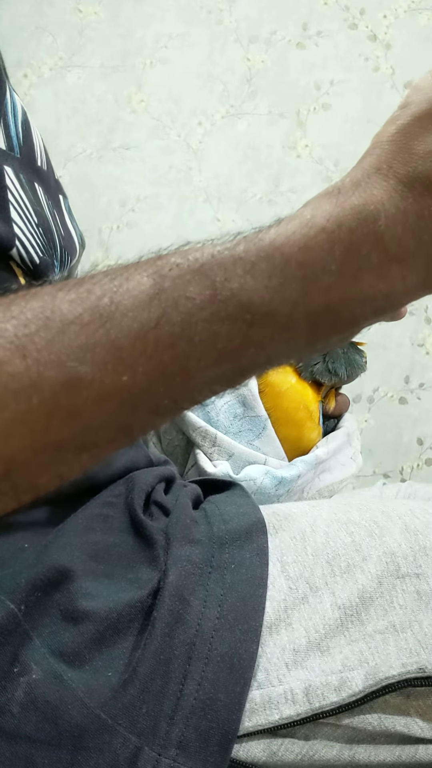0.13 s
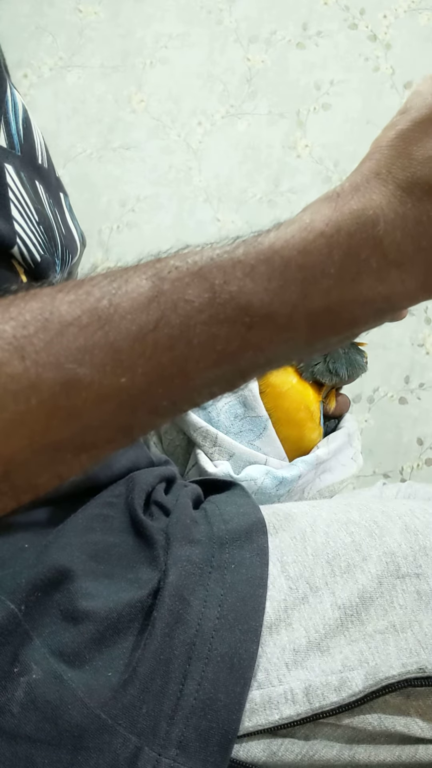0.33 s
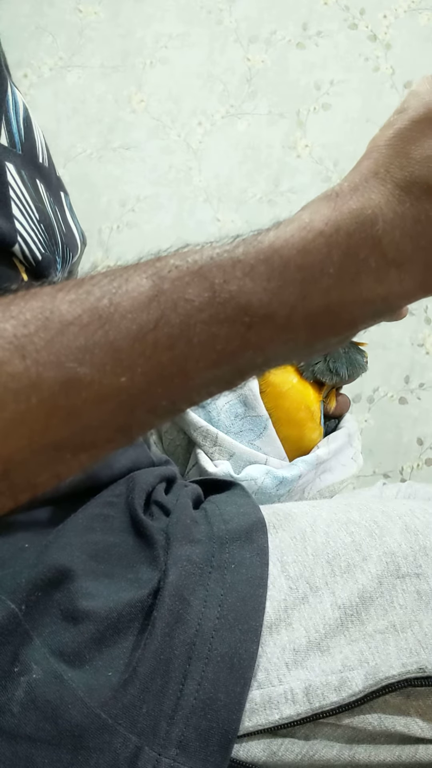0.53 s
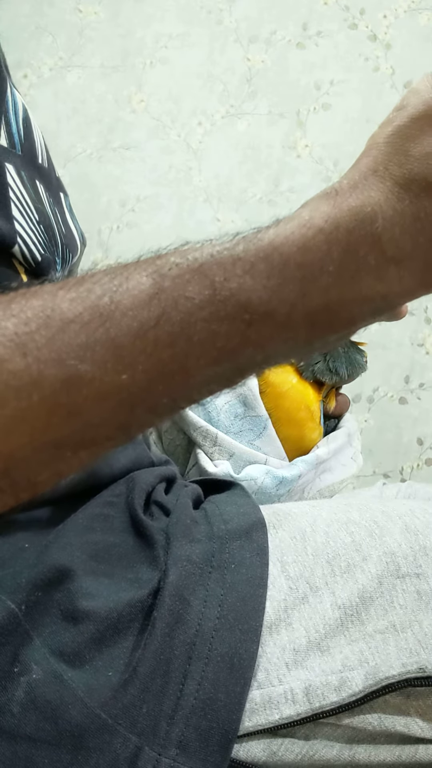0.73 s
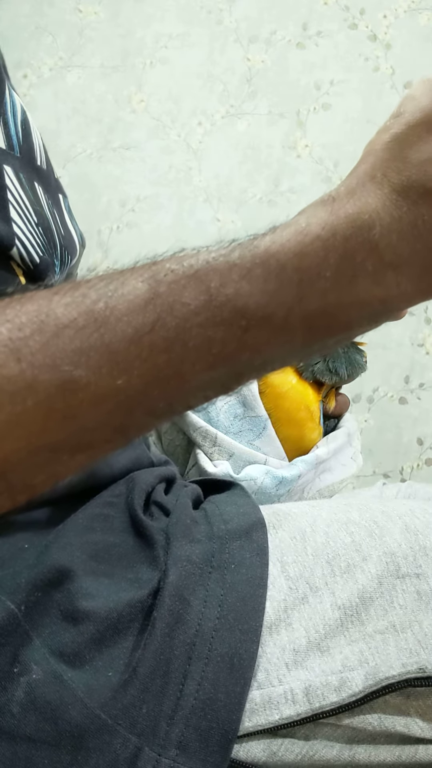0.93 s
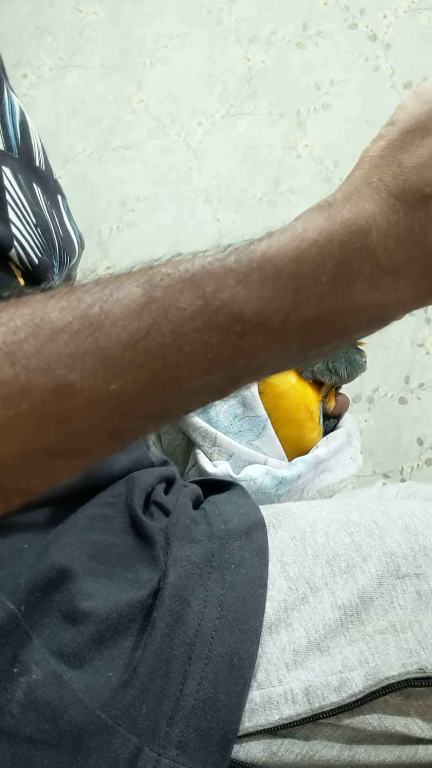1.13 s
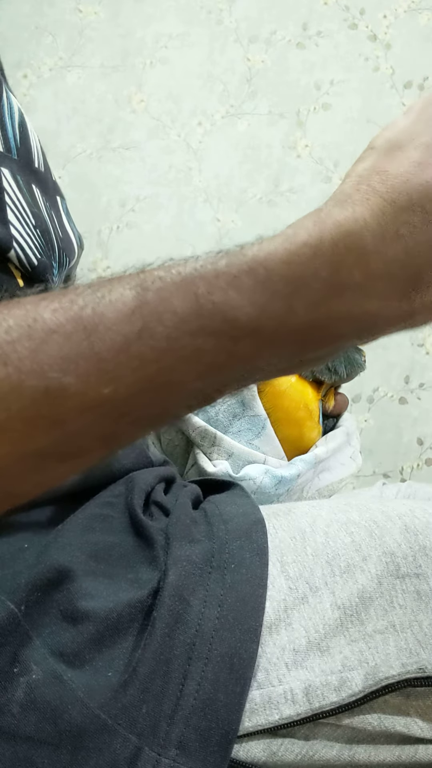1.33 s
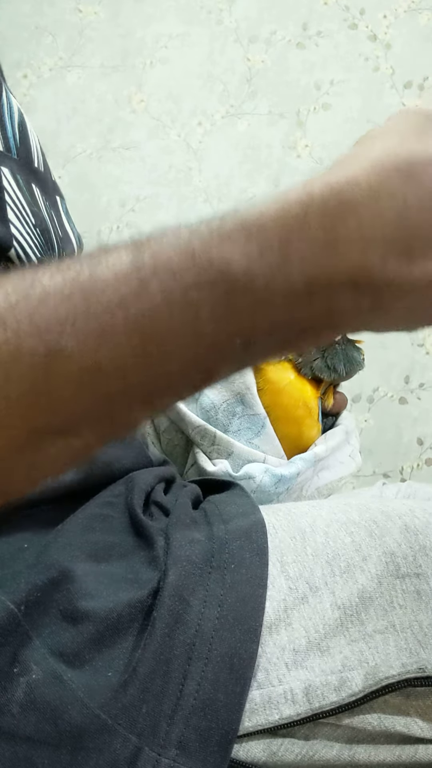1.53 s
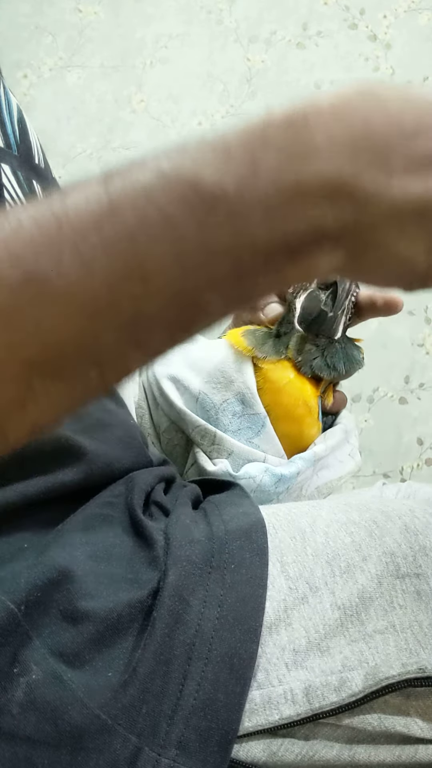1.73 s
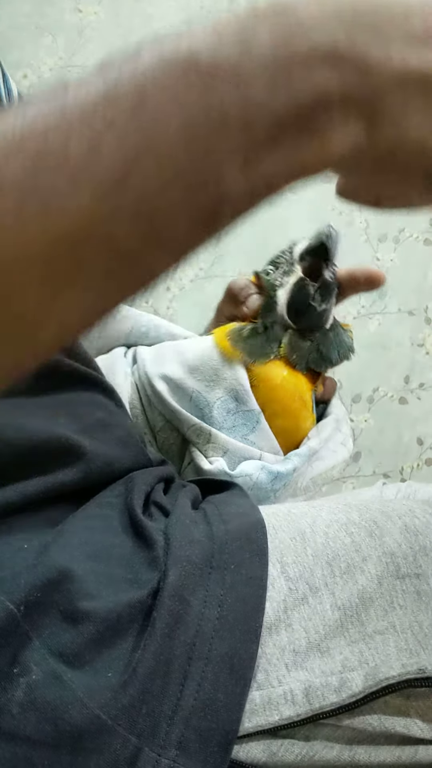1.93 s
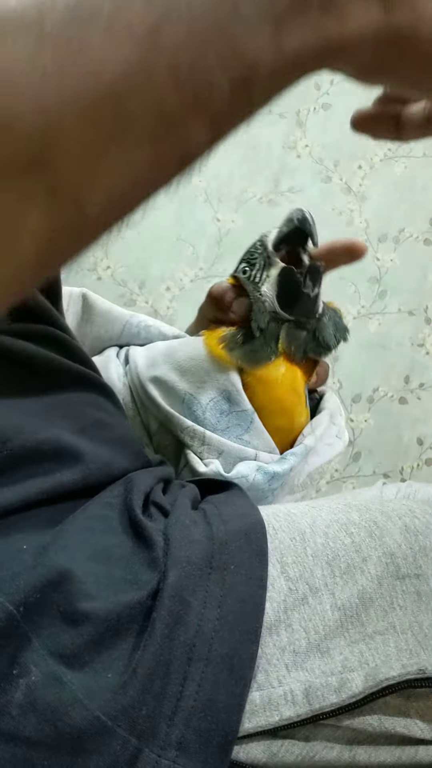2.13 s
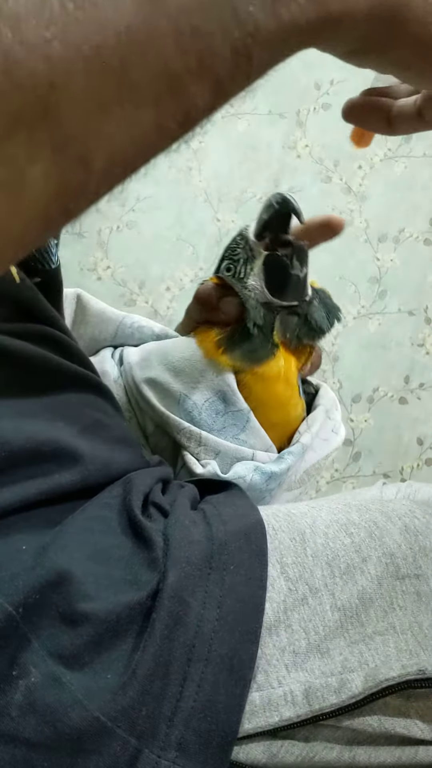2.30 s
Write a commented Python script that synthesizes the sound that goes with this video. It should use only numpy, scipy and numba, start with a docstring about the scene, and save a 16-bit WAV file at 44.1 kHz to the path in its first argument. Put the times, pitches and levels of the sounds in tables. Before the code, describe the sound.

A macaw gives one loud, harsh squawk close to the microphone, ringing briefly in a small, hard-walled room. Before it, there is only soft air noise, a low fan hum and a faint rustle of cloth.

```python
"""Soft air noise and the low hum of a fan motor fill a small, hard-walled room; cloth rustles faintly.
Then a macaw held on a lap gives one loud, harsh squawk close to the microphone.
Pulses from its syrinx ring throat resonances that move as the beak opens. The call starts as a clean
rising buzz, breaks into period doubling and a rasp at its top, and stays harsh as the pitch falls,
easing only as it dies away. The room rings after it."""
import sys
import numpy as np
from scipy import signal
from scipy.fft import rfft, irfft, next_fast_len
from scipy.io import wavfile
from scipy.ndimage import uniform_filter1d, map_coordinates
from numba import njit

SR = 44100
rng = np.random.default_rng(int(sys.argv[2]) if len(sys.argv) > 2 else 0)


def store_wav(level_fs):
    """Save 16-bit WAV to argv[1]."""
    pcm = np.round(np.clip(np.atleast_2d(level_fs), -1, 1) * 32767)
    wavfile.write(sys.argv[1], SR, pcm.T.astype(np.int16))


N = 108618
T = np.arange(N) / SR


def from_db(db):
    return 10 ** (np.asarray(db) / 20)


def unit_rms(x):
    return x / np.sqrt(np.mean(x ** 2) + 1e-20)


def in_time(rows):
    return np.interp(T, *np.transpose(rows))


def at_hz(points, hz, column=1):
    """One table column, interpolated over log frequency."""
    points = np.array(points)
    return np.interp(np.log(hz + 1), np.log(points[:, 0]), points[:, column])


def coloured(x, curve_db, column=1):
    """Minimum-phase filter with the given gain curve."""
    size = 2 * next_fast_len(N)
    gain = from_db(at_hz(curve_db, np.fft.rfftfreq(size, 1 / SR), column))
    cepstrum = irfft(np.log(gain))
    cepstrum[1:size // 2] *= 2
    cepstrum[size // 2 + 1:] = 0
    return irfft(rfft(x, size) * np.exp(rfft(cepstrum)))[..., :N]


def butter(x, cutoff_hz, kind):
    return signal.sosfilt(signal.butter(2, cutoff_hz, kind, fs=SR, output="sos"), x)


def drift(rate_hz):
    """Slow random wander, unit RMS."""
    hz = np.fft.rfftfreq(N, 1 / SR)
    return unit_rms(irfft(rfft(rng.standard_normal(N)) / (1 + (hz / rate_hz) ** 2), N))


# Air noise spectrum: freq_hz, relative_db
AIR_SPECTRUM = [(15, -28), (25, -6), (64, -13), (86, -33.5), (107, -21.5), (140, -12), (164, -9),
                (227, -5.5), (399, -13), (433, -14.5), (722, -20), (997, -19), (2060, -30), (2770, -27),
                (4380, -42), (9810, -53.5), (15500, -78)]
# Left-right likeness of the air noise: freq_hz, correlation
AIR_CORRELATION = [(60, 0.97), (200, 0.94), (800, 0.27), (2000, 0.13), (6000, 0.11)]
def air(level_db=-46, flicker_db=1.08, flicker_hz=6.1):
    """Soft room noise; each band flickers, and the bass is alike in both channels."""
    hz = np.fft.rfftfreq(N, 1 / SR)
    mid, side = rfft(rng.standard_normal((2, N))) * from_db(at_hz(AIR_SPECTRUM, hz))
    correlation = at_hz(AIR_CORRELATION, hz)
    stereo = np.sqrt(1 + correlation) * mid + np.sqrt(1 - correlation) * side * [[1], [-1]]
    edges_hz, noise = np.geomspace(15, 18000, 9), 0
    for low, high in zip(edges_hz, edges_hz[1:]):
        band = irfft(stereo * ((hz >= low) & (hz < high)), N)
        noise += band * from_db(flicker_db * drift(flicker_hz))
    return from_db(level_db) * unit_rms(noise)


# Fan motor lines: freq_hz, level_db, width_hz
HUM_LINES = [(63.94, -59, 4.7), (111.8, -57.5, 10.6), (170.6, -52.5, 5.5), (228.2, -53.5, 60)]
def fan_hum():
    """Low motor tones, each wavering in level and phase."""
    hum = 0
    for hz, level_db, width_hz in HUM_LINES:
        phase = 2 * np.pi * hz * T
        tone = drift(width_hz / 2) * np.cos(phase) + drift(width_hz / 2) * np.sin(phase)
        hum += from_db(level_db) * tone
    return hum


def bumps(rows):
    """Envelope of Gaussian rises and falls."""
    return sum(from_db(db) * np.exp(-((T - centre_s) / half_s) ** 2) for centre_s, half_s, db in rows)


# Rises of the room noise: centre_s, half_width_s, level_db
SWELL_EVENTS = [(0.4, 0.21, -51.5), (0.985, 0.18, -50.5)]
# Swell spectrum: freq_hz, relative_db
SWELL_SPECTRUM = [(200, -39), (500, 8.5), (1100, 5.5), (1700, -3), (2200, -22), (6000, -40)]
def swells():
    """The midrange of the room noise swells softly."""
    return bumps(SWELL_EVENTS) * unit_rms(coloured(rng.standard_normal(N), SWELL_SPECTRUM))


# Cloth rustles: centre_s, half_width_s, level_db
RUSTLE_EVENTS = [(1.306, 0.048, -75), (1.49, 0.091, -70)]
# Cloth spectrum: freq_hz, relative_db
CLOTH_SPECTRUM = [(2000, -16), (6000, -6), (9000, -2), (11000, -5), (15000, -13)]
def cloth(flicker_db=1.4):
    """Brief, faint swishes of fabric."""
    hiss = unit_rms(coloured(rng.standard_normal((2, N)), CLOTH_SPECTRUM))
    return bumps(RUSTLE_EVENTS) * hiss * from_db(flicker_db * drift(rate_hz=100))


# Syrinx pulse rate: time_s, pitch_hz
CALL_PITCH = [(1.9, 230), (1.912, 258), (1.924, 293), (1.942, 328), (1.968, 365), (2.0, 394), (2.03, 405),
              (2.062, 404), (2.082, 388), (2.1, 354), (2.122, 311), (2.145, 303)]
# Chaos of the vibration: time_s, roughness_0_to_1
CALL_RASP = [(1.9, .15), (1.925, .03), (1.964, .06), (1.978, .7), (2.015, .9), (2.07, .75), (2.108, .85),
             (2.135, .3)]
# Call loudness: time_s, relative_db
CALL_EFFORT = [(1.899, -56), (1.903, -21.5), (1.913, -20), (1.93, -12), (1.96, -12.5), (2.02, -12),
               (2.07, -13), (2.114, -13.5), (2.127, -27), (2.139, -43), (2.15, -55)]
CALL_START_S, CALL_END_S = CALL_EFFORT[0][0], CALL_EFFORT[-1][0]
CALLING = (T > CALL_START_S) & (T < CALL_END_S)
CYCLES = np.cumsum(in_time(CALL_PITCH) * (T > CALL_START_S)) / SR
PUFF_DECAY_PER_CYCLE = 4.0
def syrinx(jitter_s=30e-6, shimmer_db=2.5, turbulence=.65, soft_start_s=.0078):
    """One sharp pulse and one puff per cycle; rasp unsettles pulse timing and strength."""
    rasp, cycles = in_time(CALL_RASP), CYCLES + .5
    starts = np.flatnonzero(np.diff(np.floor(cycles)))[:-2]
    shimmer, jitter = rng.standard_normal((N // 100, 2))[:len(starts)].T * rasp[starts]
    # Period doubling: strong and weak pulses alternate as the voice breaks.
    break_s, break_half_width_s, break_depth = 1.99, .0068, .27
    voice_break = break_depth * np.exp(-((T[starts] - break_s) / break_half_width_s) ** 2)
    doubling = (.25 * rasp[starts] + voice_break) * (-1) ** np.arange(len(starts))
    strength = from_db(shimmer_db * shimmer) * (1 + doubling)
    # Sinc pulses fall between samples.
    position = np.interp(np.floor(cycles[starts + 1]), cycles, np.arange(N)) + jitter_s * SR * jitter
    taps = position.astype(int)[:, None] + np.arange(-8, 9)
    pulses = np.zeros(N)
    np.add.at(pulses, taps, strength[:, None] * np.sinc(taps - position[:, None]))
    softness = np.exp(-(np.maximum(T - CALL_START_S, 0) / soft_start_s) ** 2)
    pulses += softness * (butter(pulses, 2180, "low") - pulses)
    # About unit energy per puff.
    breath = puffs() * np.sqrt(2 * PUFF_DECAY_PER_CYCLE * in_time(CALL_PITCH) / SR)
    return pulses + turbulence * rasp * butter(breath, 1000, "high")


def puffs():
    """Turbulence: a decaying burst of noise in each syrinx cycle."""
    return np.exp(-PUFF_DECAY_PER_CYCLE * ((CYCLES + .5) % 1)) * rng.standard_normal(N)


@njit
def resonate(x, hz, width_hz):
    """Moving two-pole resonance, unit peak gain."""
    y = np.zeros(len(x))
    for i in range(2, len(x)):
        r = np.exp(-np.pi * width_hz[i] / SR)
        feedback = 2 * r * np.cos(2 * np.pi * hz[i] / SR) * y[i - 1] - r * r * y[i - 2]
        y[i] = (1 - r * r) / 2 * (x[i] - x[i - 2]) + feedback
    return y


# Beak movement: time_s, opening_0_to_1
BEAK_OPENING = [(1.9, 0.18), (1.925, 0.5), (1.965, 0.91), (2.03, 0.96), (2.08, 0.98), (2.11, 0.86),
                (2.14, 1)]
# Throat resonances: closed_hz, open_hz, closed_width_hz, open_width_hz, closed_db, open_db
THROAT_MODES = [(570, 496, 117, 286, -6, -22.5), (1375, 1864, 260, 487, 1, 1.5),
                (3380, 3030, 220, 630, -4, -5), (3800, 4297, 1220, 310, -9.5, -3.5),
                (4860, 4620, 1100, 1630, -42, -13.5), (8130, 7490, 230, 1030, -20.5, -11),
                (9200, 9450, 540, 180, -27, -20.5), (14800, 44000, 1200, 490, -55, -26.5)]
# Polarity of each resonance: sign
THROAT_SIGNS = [1, -1, 1, -1, -1, 1, -1, 1]
def squawk(gain_db=1.5):
    """The syrinx rings the throat, whose resonances move with the beak; effort sets the level."""
    source, beak, voice = syrinx(), in_time(BEAK_OPENING), 0
    for sign, mode in zip(THROAT_SIGNS, THROAT_MODES):
        hz, width_hz, db = [shut + (wide - shut) * beak for shut, wide in np.reshape(mode, (-1, 2))]
        voice -= sign * from_db(db) * resonate(source, hz, width_hz)
    power = uniform_filter1d(uniform_filter1d(voice ** 2, size=400), size=300)
    levelled = voice / np.sqrt(np.abs(power) + 1e-7)
    return levelled * from_db(in_time(CALL_EFFORT) + gain_db) * CALLING


def growl(centre_hz=1562, width_hz=480, open_db=-23.5, closing_db=12):
    """In the rasp, puffs shake the main resonance and fill in between partials, more as the beak shuts."""
    noise = unit_rms(butter(puffs(), [centre_hz - width_hz / 2, centre_hz + width_hz / 2], "band"))
    effort_db = in_time(CALL_EFFORT)
    level_db = open_db + closing_db * (1 - in_time(BEAK_OPENING)) + effort_db - effort_db.max()
    return from_db(level_db) * in_time(CALL_RASP) * noise * CALLING


def chest(half_open_db=-47, closing_db=8):
    """The chest radiates a soft fundamental, stronger as the beak closes."""
    stop_s = CALL_EFFORT[-2][0]
    gate = uniform_filter1d(((T > CALL_START_S) & (T < stop_s)) * 1.0, size=300)
    level_db = half_open_db + closing_db * (.5 - in_time(BEAK_OPENING))
    return from_db(level_db) * gate * np.sqrt(2) * np.cos(2 * np.pi * CYCLES)


# Partials that lock to the throat: start_s, end_s, pitch_multiple, level_db
CRY_PARTIALS = [(1.917, 1.97, 5, -14), (1.926, 1.966, 8, -27.5), (1.928, 1.955, 10, -17.5),
                (1.976, 2.01, 4.5, -11.5), (2.068, 2.08, 7, -35), (2.087, 2.134, 5, -16.5),
                (2.083, 2.123, 4.5, -21)]
def cries(edge_s=.004):
    """Single partials, reinforced by the throat, swell into clear tones."""
    phase, tones = 2 * np.pi * (CYCLES + .5), 0
    for start_s, end_s, multiple, level_db in CRY_PARTIALS:
        gate = (1 + np.tanh((T - start_s) / edge_s)) * (1 + np.tanh((end_s - T) / edge_s)) / 4
        tones += from_db(level_db) * gate * np.sqrt(2) * np.cos(multiple * phase)
    return tones


# Colour of the call at the two microphone ports: freq_hz, left_db, right_db
PORT_COLOUR = [(200, 1, 3.5), (432, 6.5, 0.5), (744, -0.5, -0.5), (1296, 2, 1), (1590, -7, -4),
               (2450, -3.5, -0.5), (3320, 3, 2), (3430, -11.5, 7.5), (4280, -2.5, 3), (6050, -2, -2),
               (6300, -21.5, -19), (7480, 1.5, -2), (8360, -17.5, -7), (9260, 5.5, -6), (11100, -7, 2),
               (12500, -4, -17), (15100, 0, -15)]
def macaw(left_lead_s=.00012):
    """The direct call reaches the left port first; each port has its own colour."""
    call = squawk() + cries() + growl() + chest()
    left, right = coloured(call, PORT_COLOUR, column=1), coloured(call, PORT_COLOUR, column=2)
    left = map_coordinates(left, [np.arange(N) + left_lead_s * SR], order=3)
    return np.array([left, right])


# Room decay: freq_hz, t60_s
ROOM_DECAY = [(300, 0.31), (1400, 0.75), (3000, 0.66), (5500, 0.59), (8000, 0.53), (14000, 0.43)]
# Wall reflection colour: freq_hz, relative_db
WALL_COLOUR = [(200, -12), (350, 9), (800, 2), (1500, -2.5), (2700, 4.5), (4500, -2.5), (7500, 1),
               (10000, -0.5), (14000, 2)]
def room(direct, early_db=-9, early_decay_s=.005, echoes_per_s=2500, tail_db=-9.5):
    """Hard walls return near reflections, then a diffuse tail that rings longest in the midrange."""
    t, hz = T[:SR], np.arange(SR // 2 + 1)
    early = rng.standard_normal((2, SR)) * (rng.random((2, SR)) < echoes_per_s / SR)
    early *= np.exp(-t / early_decay_s) * (t > .001)
    early /= np.sqrt(np.sum(early ** 2, axis=1, keepdims=True) + 1e-12)
    white = rfft(rng.standard_normal((2, SR)))
    edges_hz, tail = np.geomspace(100, 18000, 13), 0
    for low, high in zip(edges_hz, edges_hz[1:]):
        centre_hz = np.sqrt(low * high)
        band = irfft(white * ((hz >= low) & (hz < high)), SR)
        decay = from_db(-60 * t / at_hz(ROOM_DECAY, centre_hz)) * (t > .006)
        tail += from_db(at_hz(WALL_COLOUR, centre_hz)) * band * decay / np.sqrt(np.sum(decay ** 2))
    response = from_db(early_db) * early + from_db(tail_db) * tail
    return signal.fftconvolve(direct, response, axes=1)[:, :N]


def scene():
    """The bird and its echo over the quiet room, whose noise leans slightly left."""
    call, balance_db = macaw(), [[.6], [-.6]]
    return call + room(call) + (air() + fan_hum() + swells()) * from_db(balance_db) + cloth()


def record(dry, ceiling=.73, cutoff_hz=15650):
    """Soft-clipped peaks, then a steep low-pass."""
    lowpass = signal.ellip(10, .1, 80, cutoff_hz, fs=SR, output="sos")
    return signal.sosfilt(lowpass, ceiling * np.tanh(dry / ceiling))


dry = scene()
out = record(dry)
store_wav(out)
```